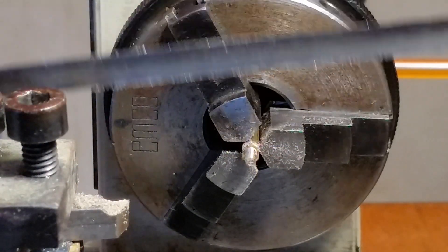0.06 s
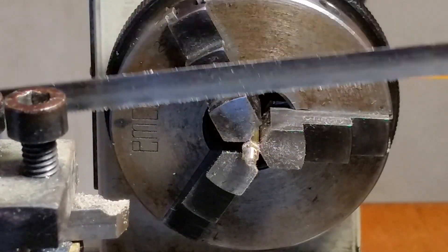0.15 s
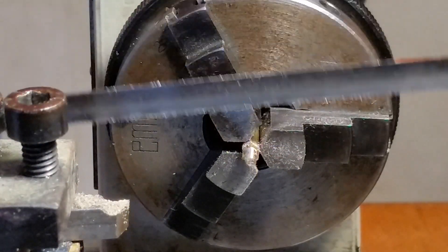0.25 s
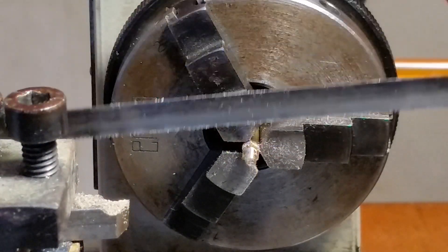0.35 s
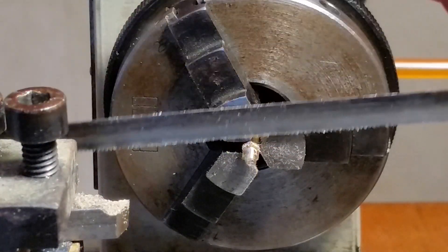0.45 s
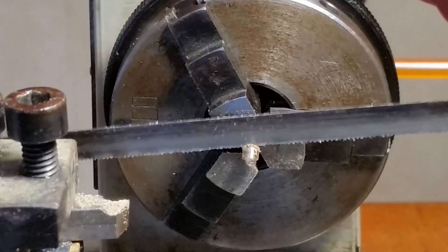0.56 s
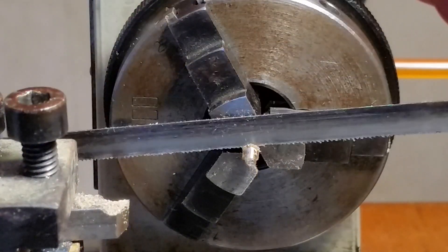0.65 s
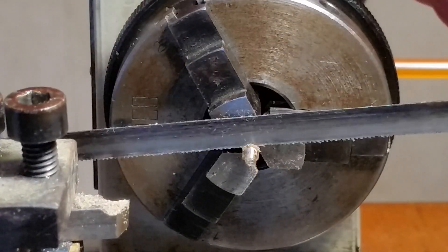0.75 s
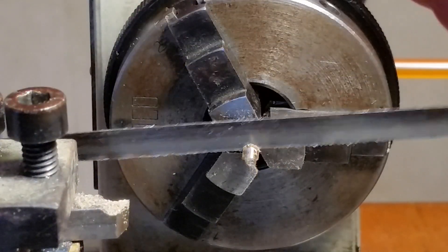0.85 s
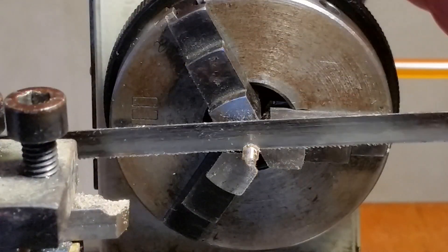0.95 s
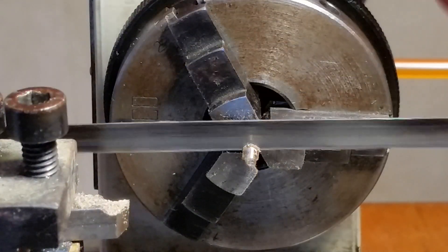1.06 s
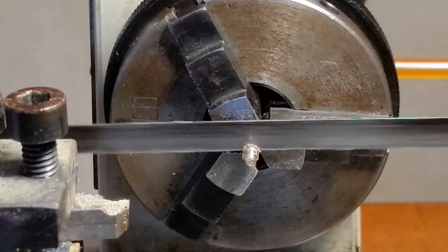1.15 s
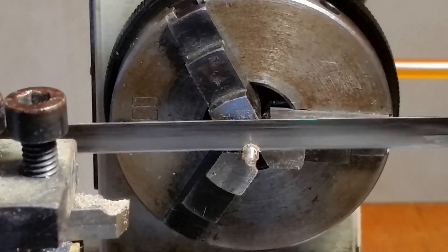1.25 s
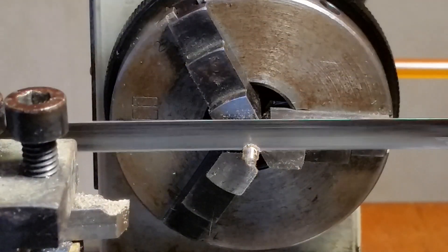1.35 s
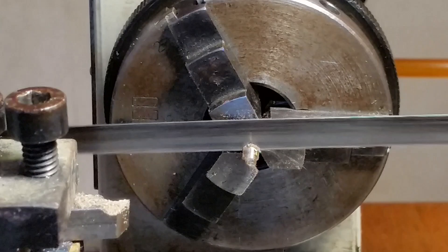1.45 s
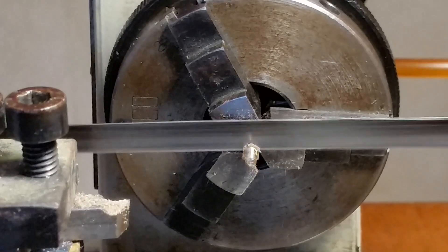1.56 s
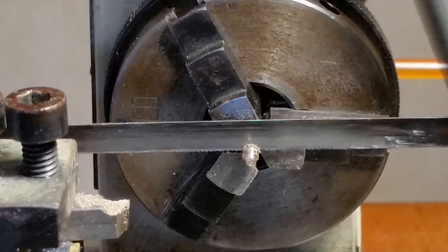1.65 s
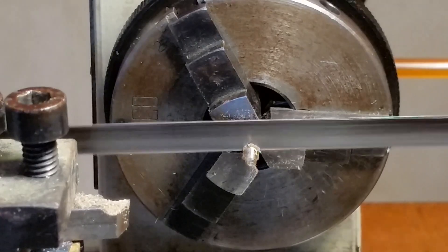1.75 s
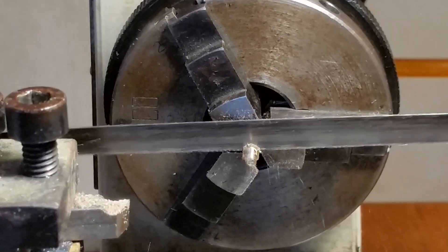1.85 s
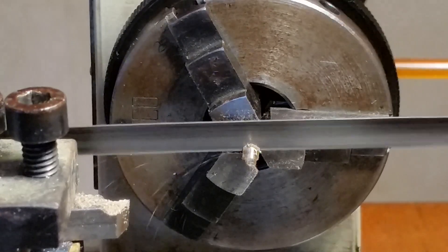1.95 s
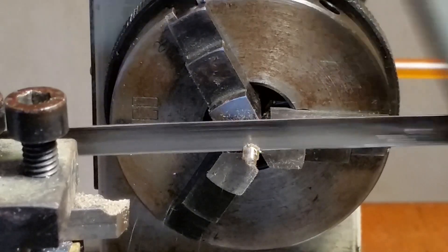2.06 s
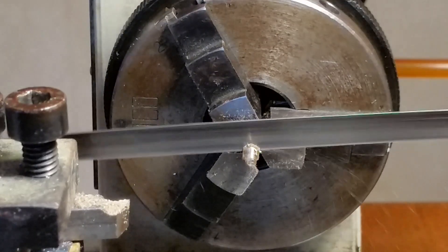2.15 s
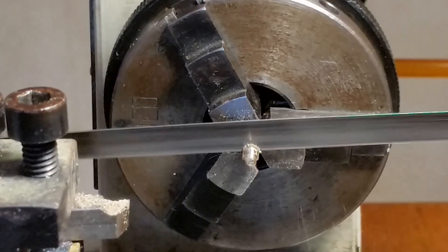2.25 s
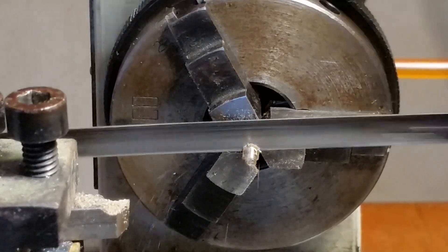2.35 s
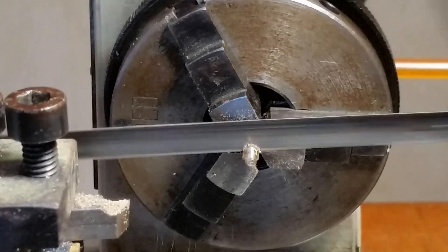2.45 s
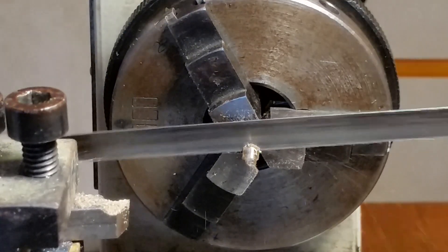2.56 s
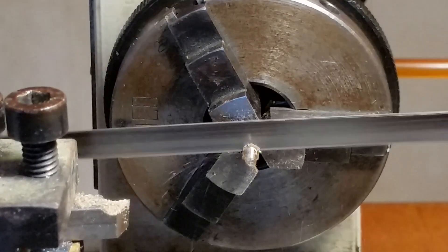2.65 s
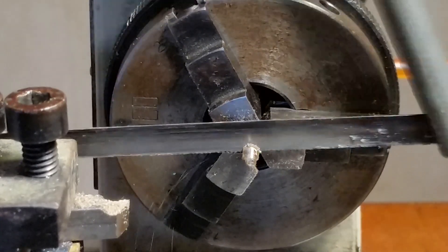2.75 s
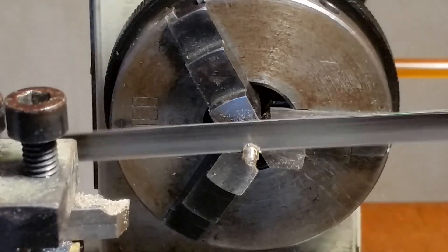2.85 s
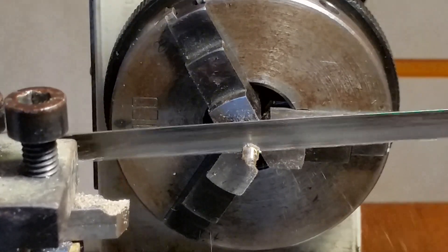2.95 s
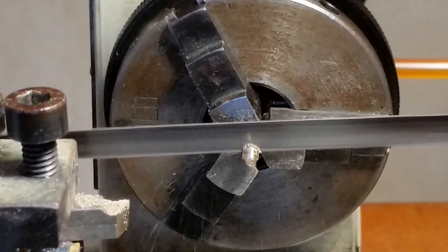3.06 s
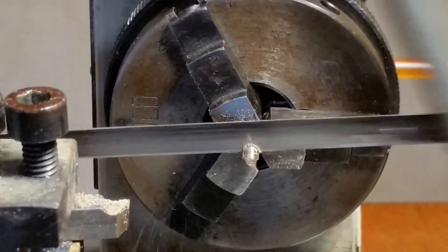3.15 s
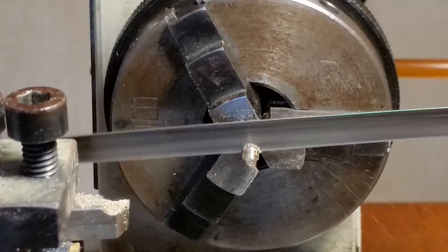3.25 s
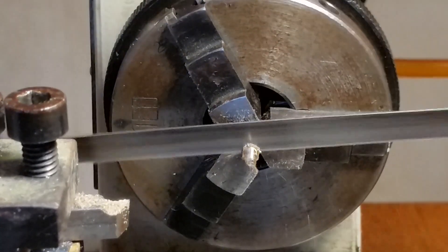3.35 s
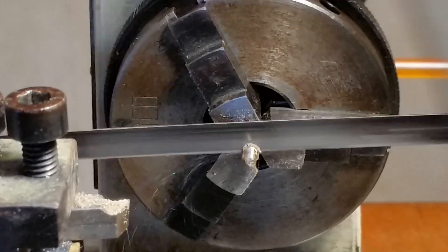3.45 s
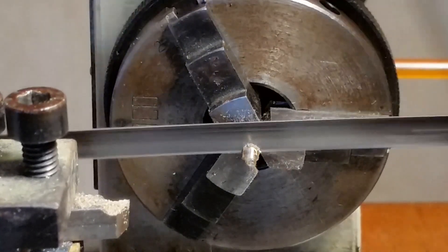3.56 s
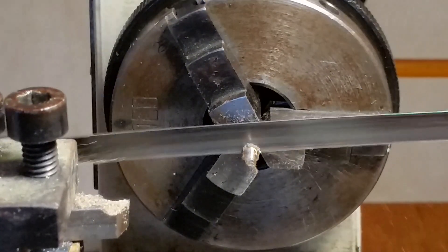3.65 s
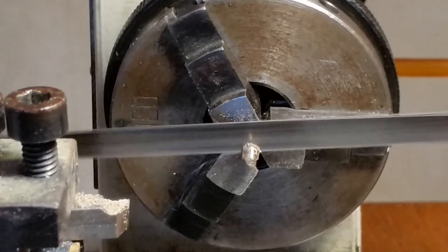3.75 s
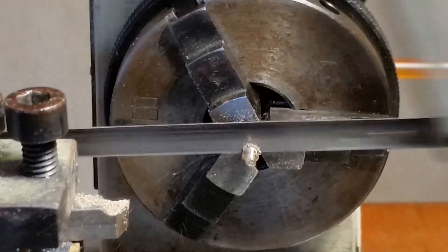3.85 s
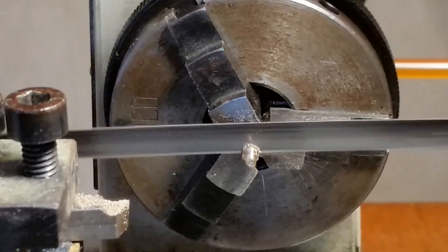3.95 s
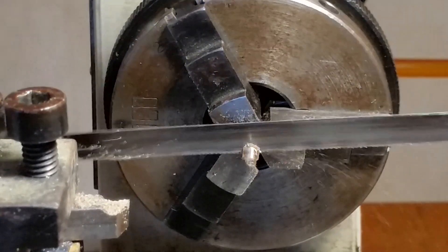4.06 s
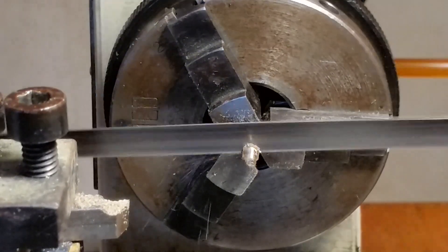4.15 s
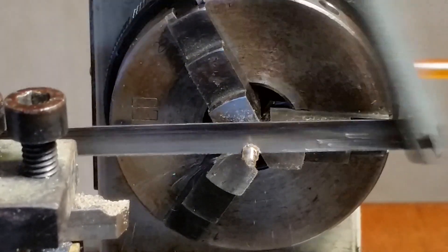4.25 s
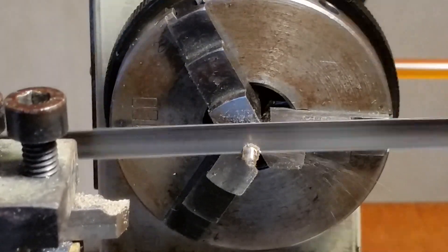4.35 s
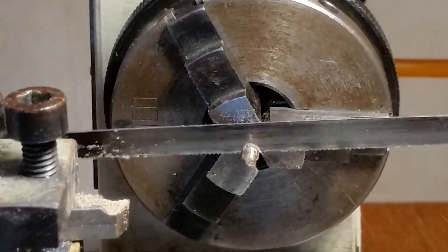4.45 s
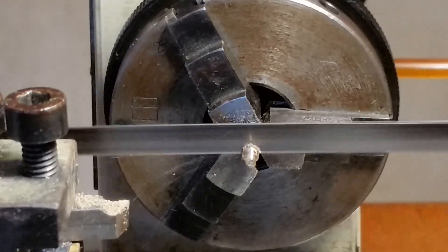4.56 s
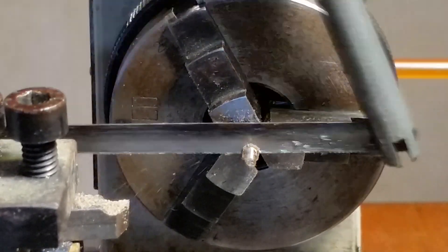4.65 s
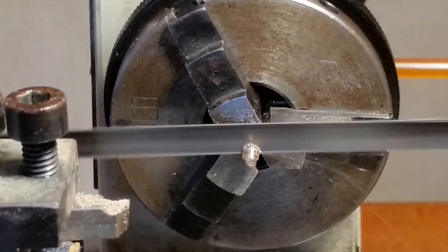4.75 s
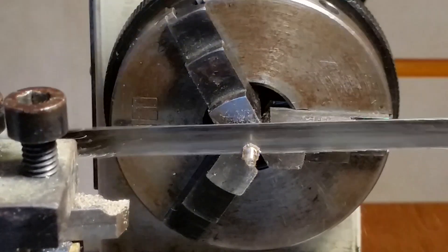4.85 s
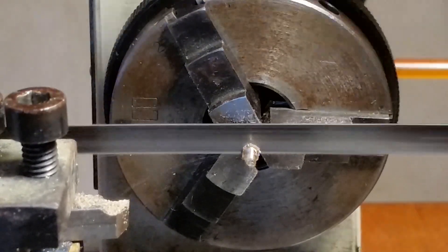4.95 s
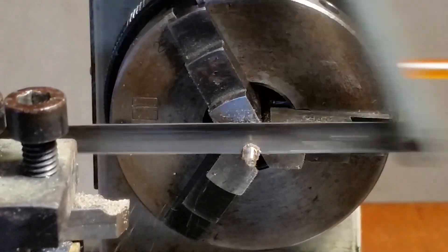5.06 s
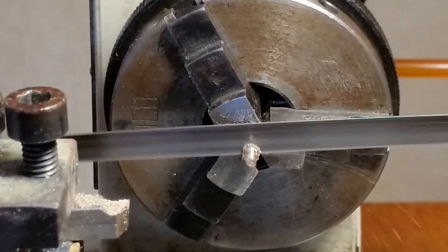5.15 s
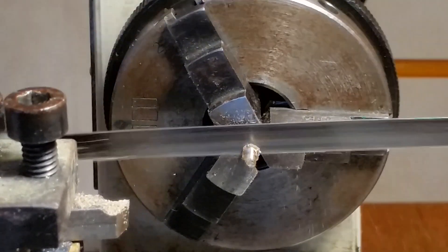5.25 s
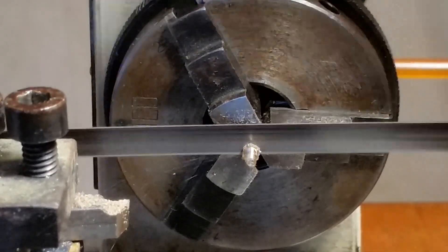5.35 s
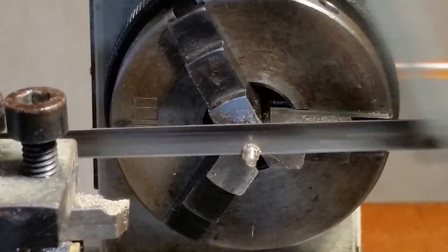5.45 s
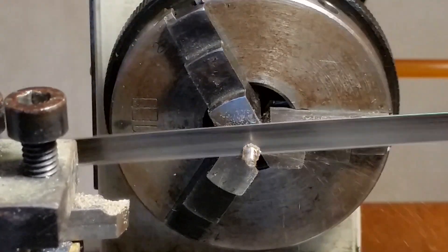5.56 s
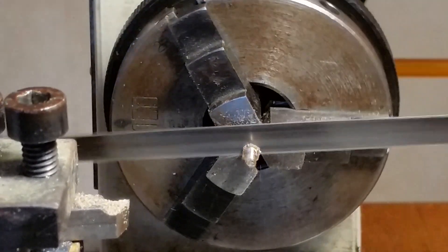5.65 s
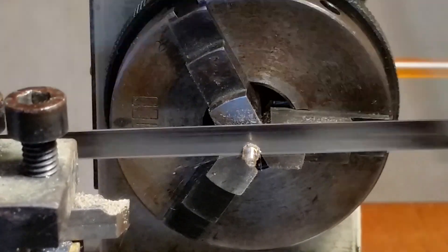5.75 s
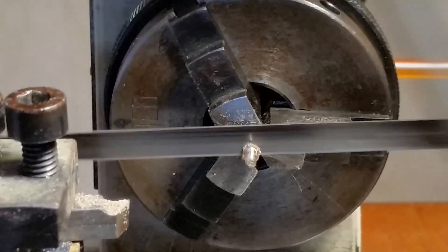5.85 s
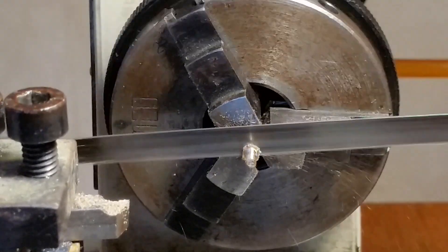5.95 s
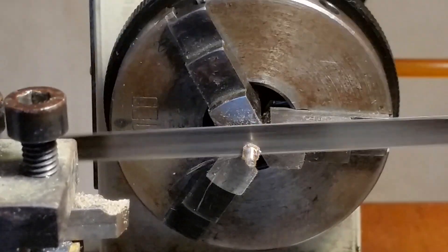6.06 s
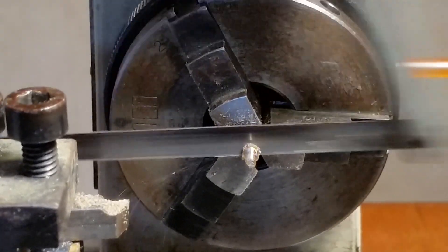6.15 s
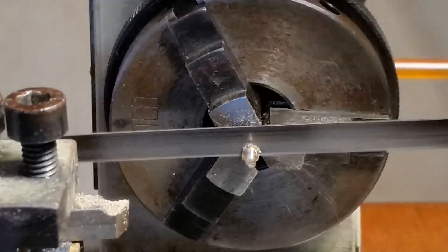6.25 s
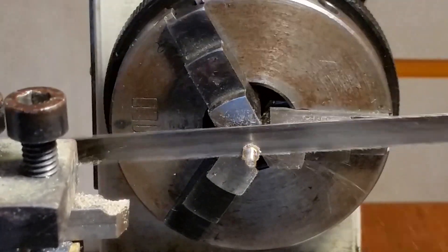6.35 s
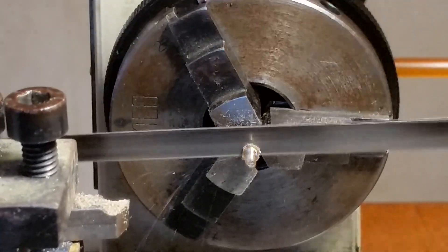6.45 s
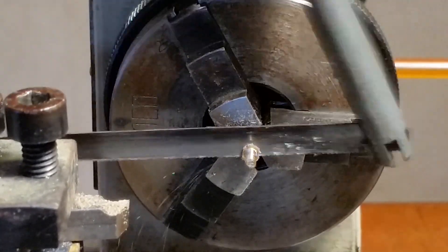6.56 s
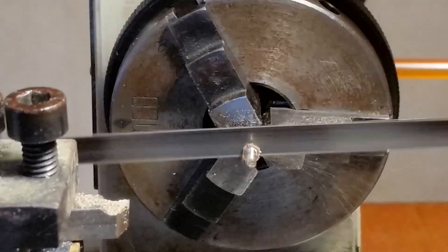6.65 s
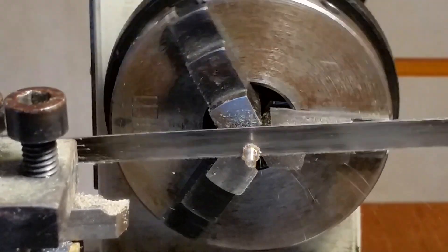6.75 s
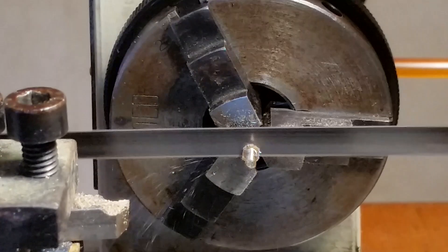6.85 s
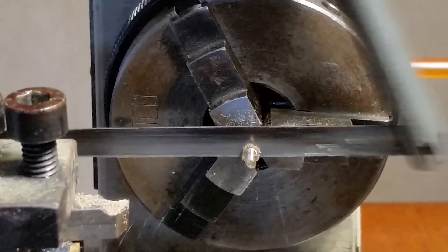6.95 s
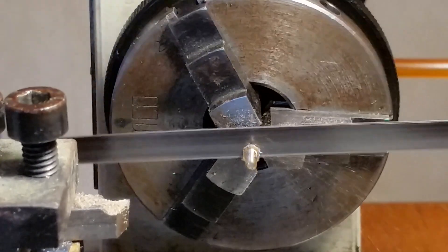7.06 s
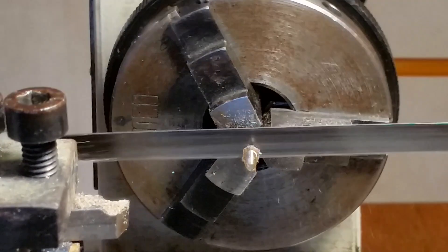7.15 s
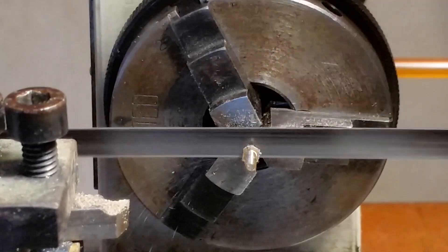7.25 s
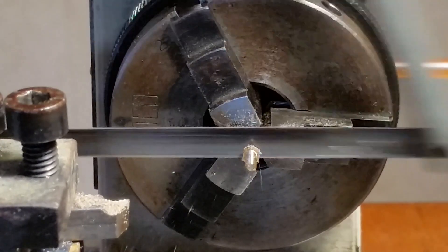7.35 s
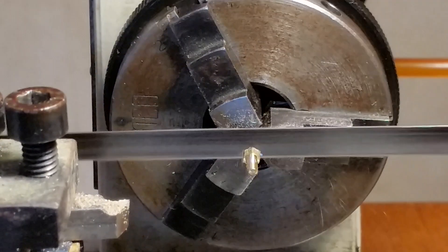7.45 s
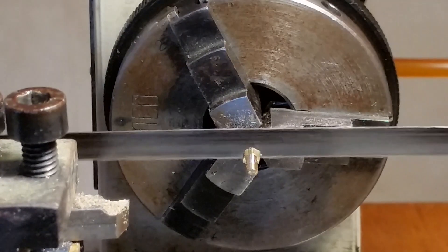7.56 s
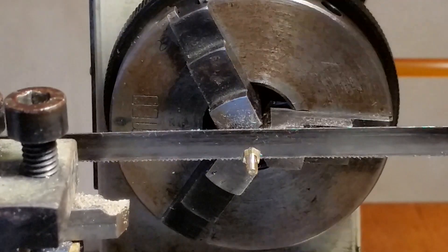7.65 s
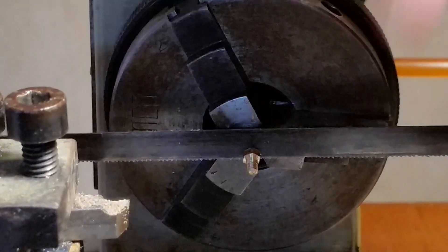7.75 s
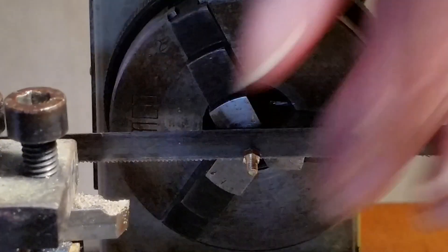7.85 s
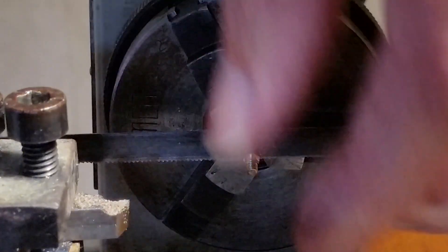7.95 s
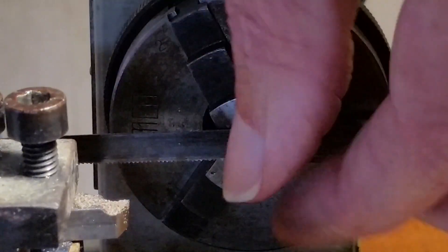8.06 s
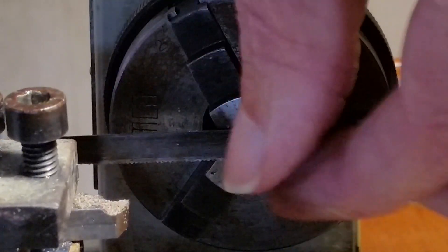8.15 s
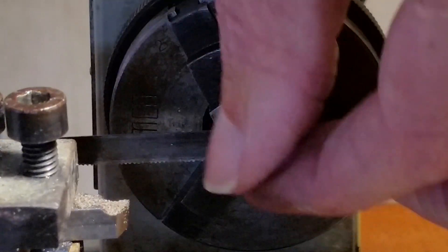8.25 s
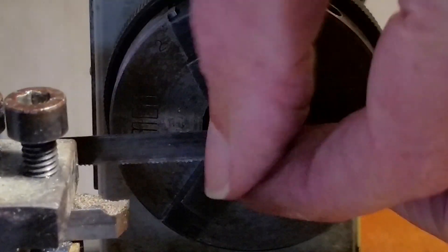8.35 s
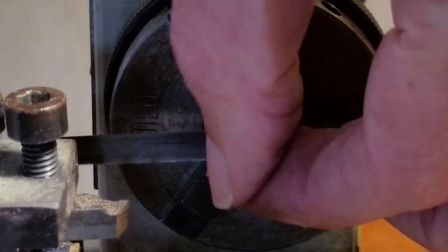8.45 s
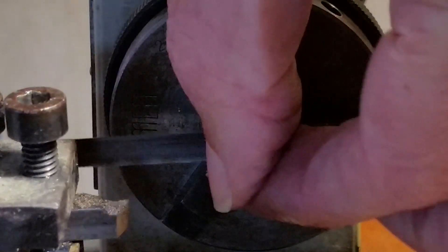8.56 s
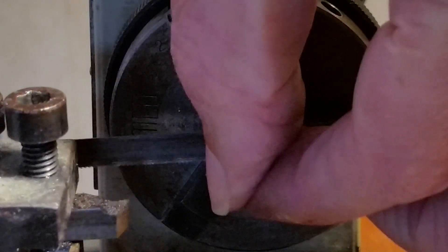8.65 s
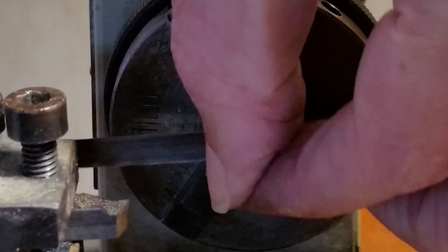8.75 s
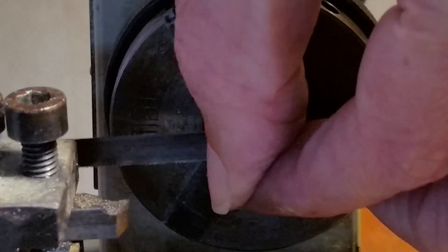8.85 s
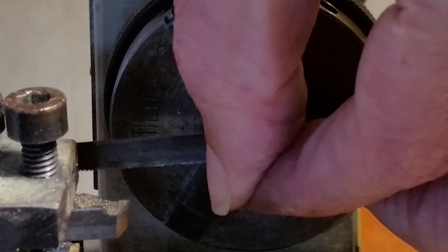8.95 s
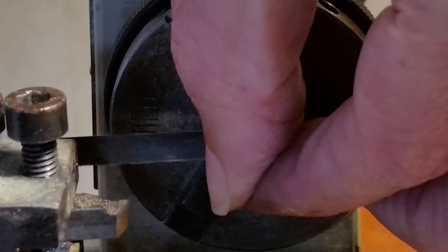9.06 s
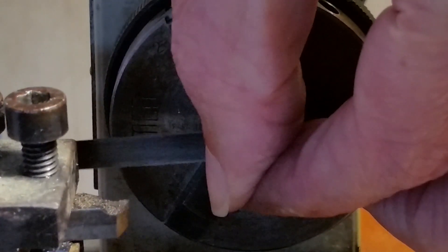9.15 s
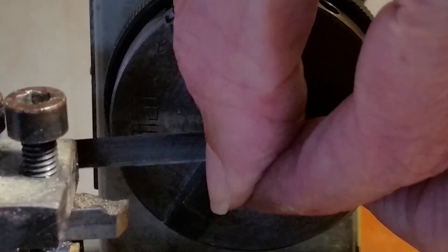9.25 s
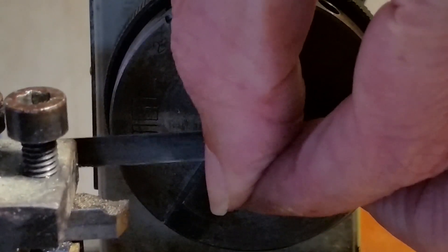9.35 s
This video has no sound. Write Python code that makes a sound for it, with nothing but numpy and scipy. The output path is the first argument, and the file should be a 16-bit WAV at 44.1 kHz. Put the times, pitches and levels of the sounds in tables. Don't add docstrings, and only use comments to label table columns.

```python
import sys
import numpy as np
from scipy import signal
from scipy.fft import rfft, irfft
from scipy.io import wavfile
from scipy.ndimage import uniform_filter1d

SR = 44100
rng = np.random.default_rng(int(sys.argv[2]) if len(sys.argv) > 2 else 0)


def invert_db(level):
    return 10 ** (np.asarray(level, dtype=float) / 20)


def store_pcm(level_fs):
    pcm = np.round(np.clip(level_fs, -1, 1) * 32767).astype(np.int16)
    wavfile.write(sys.argv[1], SR, np.atleast_2d(pcm).T)


N = 414099
T = np.arange(N) / SR
GROOVED_S = 2.1
CRACK_MODE = (2280, 690, -5)

# pitch_hz, width_hz, level_db
HUM_MODES = [(430, 34, -4.5), (572, 24, -10.5), (695.5, 24, -1), (784.6, 29, -0.5), (850, 30, -2.5),
             (700, 170, -10)]


def saw():
    tooth_hz, pushing, share, (hum, cut, rasp, fizz) = stroke_controls()
    teeth, bite, clicks = passing_teeth(tooth_hz, pushing)
    catches = snags(pushing)

    caught = taps(np.transpose(PULL_SNAGS + PUSH_SNAGS)[0], 0)
    dig = invert_db(3 * fade(caught, 0.036) - 2.5)
    stall = invert_db(0.5 * fade(caught[::-1], 0.0047)[::-1])
    tearing = cut * unit(unit(bite * grit(2.53, 0.64, 120)) + 0.62 * clicks) * dig * stall
    rasp, fizz = rasp * stall, fizz * stall

    out = invert_db(6) * ring(hum * unit(teeth), HUM_MODES)
    out += band(saw_frame(tearing, catches), 314, 3600)
    out += band(saw_blade(tearing, rasp, bite, clicks, share, pushing, catches), 2100, 12000)
    out += band(tooth_edge(fizz, bite, share, catches), 8500, 17000)
    out += flying_chips(catches)
    return out, invert_db(-20.5) * hum ** 0.33


# start_s, top_tooth_rate_hz, pressure_db, hum_evenness_db
PULLS = [(1.269, 653.7, -18.5, -19), (1.631, 733, -5.5, -7.5), (2.002, 700, -3, -8),
         (2.366, 678.7, -2, -4.5), (2.735, 682.7, -0.5, -4), (3.095, 679.6, -0.8, 0.5),
         (3.465, 706.7, 1.4, -0.5), (3.844, 723, -0.3, 1), (4.223, 760, 1.5, -1), (4.612, 770, 1.5, -2),
         (4.995, 766.7, -1, -8.5), (5.377, 747.6, -1.4, -2), (5.759, 708.4, -1.7, -1),
         (6.146, 742.8, -2.3, 0.5), (6.52, 775, -1.5, -3), (6.899, 718.4, -1.5, -0.5),
         (7.284, 719.6, 2.5, 0.5)]
# start_s, top_tooth_rate_hz, pressure_db, hum_evenness_db
PUSHES = [(1.435, 622.7, -5, -6.5), (1.807, 622, -2.5, 2.5), (2.168, 731.4, -0.1, -7.5),
          (2.536, 706.5, -1, -10.5), (2.901, 700, 0, -4), (3.268, 729, -0.2, -5), (3.635, 768.5, -1, -2),
          (4.028, 793.5, 0.5, -3), (4.408, 782.5, 0, -3), (4.805, 782.8, -0.3, -1),
          (5.175, 808.4, -0.3, -1), (5.557, 786.3, -1.5, -2), (5.942, 769, -1, 2), (6.324, 780, 0, 2.5),
          (6.699, 794, 1.5, -1), (7.078, 760, 1.5, -1), (7.467, 651, 0.5, 2)]
# top_db, reached_share (0-1), held_until_share (0-1), start_drop_db, end_drop_db
PULL = [
    (-41.5, 0.28, 0.59, 13.5, 13),
    (-33, 0.48, 0.56, 8, 20),
    (-39, 0.58, 0.78, 13, 19.5),
    (-46, 0.8, 0.72, 12, 27),
]
# top_db, reached_share (0-1), held_until_share (0-1), start_drop_db, end_drop_db
PUSH = [
    (-35, 0.49, 0.5, 23, 22),
    (-27.5, 0.48, 0.51, 20, 33),
    (-37, 0.29, 0.42, 16.5, 20.7),
    (-44.5, 0.19, 0.58, 55, 29),
]
# time_s, fine_chips_db
GROOVE = [
    (1.3, -14),
    (1.9, -3.5),
    (4.5, -1.2),
    (5.7, 1.5),
    (6.6, 0),
    (7.3, -3),
    (7.66, -13),
]


def stroke_controls():
    start, top_hz, press_db, even_db = np.transpose(sorted(PULLS + PUSHES))
    stop_s = 7.665
    turns = np.append(start, stop_s)
    place = np.interp(T, turns, np.arange(len(turns))) % len(start)
    index, share = place.astype(int), place % 1
    pushing = index % 2
    middle = (turns[1:] + turns[:-1]) / 2
    sawing = uniform_filter1d(1. * (T > start[0]) * (T < stop_s), size=800)

    pressure_db = np.interp(T, middle, press_db)
    groove_db = np.interp(T, *np.transpose(GROOVE))
    extra_db = [np.interp(T, middle, even_db), 0, 0.23 * groove_db, groove_db]
    gains = []
    for pull, push, extra in zip(PULL, PUSH, extra_db):
        db = np.where(pushing, swell(share, *push), swell(share, *pull)) + pressure_db + extra
        gains.append(sawing * invert_db(uniform_filter1d(db, size=300)))

    speed = np.minimum(np.minimum(.2 + 2.4 * share, 1), .55 + 2.5 * (1 - share))
    return top_hz[index] * speed, pushing, share, gains


def swell(share, top_db, reach, hold, start_db, end_db):
    rise = np.clip(1 - share / reach, 0, 1)
    fall = np.clip((share - hold) / (1 - hold), 0, 1)
    return top_db - start_db * rise ** 1.57 - end_db * fall ** 1.57


def passing_teeth(tooth_hz, pushing):
    wobble = np.where(pushing, .045, .12)
    phase = np.cumsum(tooth_hz * (1.02 + wobble * walk(200))) / SR
    hum = np.sin(2 * np.pi * phase) * invert_db(3.6 * walk(120))
    bite = 0.39 + np.exp(-(phase % 1) / 0.18)
    bite *= invert_db(2.9 * walk(180))
    bite *= invert_db(2.5 * np.cos(2 * np.pi * phase / 8.6))
    tick_gain = invert_db(13 * np.minimum(rng.standard_normal(N), 1.4))
    clicks = unit(np.diff(np.floor(phase), prepend=0) * tick_gain)
    return hum, bite, clicks


# time_s, peak_db, low_modes_rel_db
PULL_SNAGS = [(1.7304, -22, -1.5), (2.079, -15.5, -16), (2.445, -16, -21), (2.8092, -15, -31),
              (3.1746, -18, -15), (3.546, -19.5, -13), (3.9313, -16.5, -24.5), (4.3137, -18, -12.5),
              (4.6917, -12.5, -18), (5.0697, -15, -11), (5.459, -18, -7.5), (5.8405, -19, -8.5),
              (6.2247, -15, -14), (6.585, -16, -26), (6.9764, -17.5, -9.5), (7.3672, -16, -33)]
# time_s, peak_db, low_modes_rel_db
PUSH_SNAGS = [(1.5075, -19, -20), (1.887, -18, -4), (2.243, -11, -5), (2.6126, -9, -3.5),
              (2.977, -12, -6.5), (3.342, -10.5, -5), (3.7146, -11, -6.5), (4.1034, -12, -2.5),
              (4.4885, -10.5, -5), (4.8817, -9.5, -5.5), (5.2518, -10.5, -3.5), (5.6429, -10.5, -3.5),
              (6.0258, -14.5, 0), (6.411, -13, -3), (6.7934, -19, 5.5), (7.194, -14.5, -5.5),
              (7.5595, -20, -0.5)]
# earlier_s (negative is later), rel_db, low_modes_more_db
PULL_LEADS = [(-0.027, -8, 10.5)]
# earlier_s (negative is later), rel_db, low_modes_more_db
PUSH_LEADS = [(-0.011, -17.5, 1.5)]
# time_s, peak_db, low_modes_rel_db
STRAY_SNAGS = [(1.467, -28.5, -33), (1.526, -21.5, -17), (1.7089, -21, -16), (1.874, -16.5, -10),
               (3.945, -17.5, -3.5), (4.169, -25, 3), (7.17, -17, 0.5), (7.5541, -21, -4),
               (2.093, -19.5, -10), (7.4993, -25.5, 7), (7.515, -20.5, 3.5)]
# time_s, upper_peak_db, low_modes_rel_db
EARLY_SNAGS = [(1.677, -36, -1), (1.699, -31, 4), (1.912, -31, -11), (2.067, -33, -11.5),
               (2.183, -29.5, -16), (2.2204, -29, -1), (2.4213, -30.5, -8), (2.5613, -33, -8.5),
               (2.588, -25.5, 2.5), (2.6977, -27.5, -10), (2.7729, -30.5, -8), (2.7876, -27, -12),
               (2.8752, -31.5, -10), (2.9317, -26, -13), (2.948, -44, 6), (3.137, -36, -14),
               (3.152, -24, -12), (3.315, -33.5, 2), (3.5102, -33, -7), (3.524, -23, -7.5),
               (3.557, -32.5, -13), (3.8981, -25, -12), (3.9101, -22.5, -8), (4.0794, -35, -0.5),
               (4.268, -39.5, -4.5), (4.2854, -26.5, -9.5), (4.2958, -28.5, -5.5), (4.4713, -26, 1.5),
               (4.6702, -28, -6), (4.6796, -26.5, -8), (4.8396, -24.5, 3), (5.0398, -32, -6),
               (5.0498, -25, -4), (5.2105, -30.5, 4), (5.2362, -19.5, -4.5), (5.4314, -28.5, -5.5),
               (5.4421, -24.5, -8.5), (5.6082, -36, 13), (5.6229, -25, 0.5), (5.8116, -29, -4),
               (5.8223, -24, -5.5), (5.9834, -45, -6), (6.0037, -31, 8), (6.1842, -32, 3.5),
               (6.2054, -22.5, -6.5), (6.3886, -40, 0), (6.3951, -26.5, 2), (6.5483, -28, -4),
               (6.5974, -22, 1), (6.7467, -30, 6), (6.774, -19.5, -4), (6.8162, -17, -4),
               (6.9564, -19.5, -3.5), (7.1212, -34, 6.5), (7.142, -30.5, 11.5), (7.2312, -37, -2.5),
               (7.3214, -26, -8), (7.3397, -20.5, -5)]


def snags(pushing):
    rows = PULL_SNAGS + PUSH_SNAGS + STRAY_SNAGS
    for main, leads in ((PULL_SNAGS, PULL_LEADS), (PUSH_SNAGS, PUSH_LEADS)):
        for early_s, less_db, more_db in leads:
            rows = rows + [(s - early_s, db + less_db, low_db + more_db)
                           for s, db, low_db in main if s > GROOVED_S]
    rows = rows + [(s, db + 2, low_db - 2) for s, db, low_db in EARLY_SNAGS]
    s, db, low_db = np.transpose(rows)
    pulled_db = 1 - pushing[(s * SR).astype(int)]
    return s, db + pulled_db, low_db - pulled_db


def crack(s, db):
    bounce_s = .0055
    db = db + 13.5
    return taps(s, db) - taps(s + bounce_s, db - 2.5) + taps(s + 2 * bounce_s, db - 5.5)


# pitch_hz, width_hz, level_db
LOW_MODES = [(559, 138, -2), (760, 177, -2), (1003, 100, -4), (1116, 49, -4), (1266, 53, -2),
             (1468, 84, -8), (1548, 92, -9), (1690, 75, -5.5)]
# pitch_hz, width_hz, level_db
HIGH_MODES = [(2260, 760, -6.5), (2313, 62, 4), (2445, 100, -1), (2754, 152, 1.5), (2696, 42, -8.5),
              (2870, 160, -26.5)]


def saw_frame(tearing, catches):
    s, db, low_db = catches
    rise_s = 0.0018
    low_jolt = blows(s, db + low_db - 5.5, 0.005, rise_s) + invert_db(-2.5) * crack(s, db + low_db)
    high_jolt = blows(s, db - 13.5, 0.011, rise_s) + crack(s, db - 5.5)
    frame = struck(tearing * invert_db(-2.5), LOW_MODES, shift_db=3, rate=40)
    frame += struck(low_jolt, LOW_MODES[2:])
    frame += struck(tearing * invert_db(-7), HIGH_MODES, shift_db=3, rate=40)
    frame += struck(high_jolt, HIGH_MODES + [CRACK_MODE])
    thuds = after(PUSH_SNAGS, [(-.025, -18.5), (.004, -16)])
    frame += struck(taps(*np.transpose(thuds)), [(460, 42, 0), (578, 69, 0.0051)])
    return frame


# pitch_hz, width_hz, level_db
RASP_MODES = [(3400, 840, -21), (3650, 270, -6.5), (4490, 220, -2), (5340, 410, -1.5), (6340, 530, -6.5),
              (6640, 110, 9), (6825, 540, 1.5), (7430, 510, -2.5), (8203, 130, -0.5)]


def saw_blade(tearing, rasp, bite, clicks, share, pushing, catches):
    s, db, _ = catches
    rasping = rasp * unit(unit(bite * grit(1.6, 1.1, 130)) + 1.1 * clicks)
    dulling = invert_db(-8 * (1.5 - pushing) * np.clip((share - 0.38) / 0.13, 0, 1))
    blade = struck(rasping * invert_db(-4), RASP_MODES[2:-2], shift_db=3, rate=70)
    blade += struck(tearing * invert_db(-24), RASP_MODES[:2], shift_db=2, rate=56)
    blade += struck(rasping * dulling * invert_db(-13.5), RASP_MODES[-2:], shift_db=3.5, rate=64)
    blade += sing(share, rasp * grit(3, 3, 110), end_hz=4699.5, sag_hz=-1200, width_hz=200.5, db=-17.5)
    blade += struck(blows(s, db - 17.5, 0.0063), RASP_MODES)
    return blade


# pitch_hz, width_hz, level_db
FIZZ_MODES = [(8900, 990, -8.5), (9980, 300, 0.5), (10520, 900, -6), (12050, 430, -1), (13440, 250, 4),
              (13900, 910, -5.5), (15300, 570, 0.5)]
# time_s, peak_db
SNAPS = [(1.8539, -36), (2.0525, -38), (2.2221, -32), (2.4441, -32), (2.5882, -36), (2.6311, -33.5),
         (2.8062, -36), (2.9549, -29), (3.1719, -33), (3.2872, -33.5), (3.361, -33), (3.5096, -35.5),
         (3.5286, -32), (3.5705, -39), (3.6618, -39), (3.6957, -27), (3.7331, -34), (3.8968, -38),
         (3.9157, -37), (3.9302, -33.5), (4.0689, -38), (4.0838, -34.5), (4.256, -37.5), (4.3133, -34.5),
         (4.4545, -31), (4.4545, -36.5), (4.4725, -32.5), (4.5054, -25), (4.6655, -35.5), (4.8381, -37.5),
         (4.8526, -33), (5.0247, -36), (5.0681, -28), (5.2208, -33), (5.2906, -26), (5.4582, -30),
         (5.5884, -37), (5.6074, -25.5), (5.6558, -31), (5.6767, -33), (5.8399, -30), (5.9681, -42.5),
         (5.983, -32), (5.9925, -29), (6.0718, -30.5), (6.1781, -36.5), (6.223, -29.5), (6.3542, -42),
         (6.3711, -32), (6.428, -30), (6.5448, -36.5), (6.5901, -23), (6.7248, -39), (6.9608, -35),
         (6.9748, -25.5), (7.1294, -32), (7.303, -41), (7.5016, -41)]


def tooth_edge(fizz, bite, share, catches):
    s, db, _ = catches
    fizzing = fizz * unit(bite ** 0.6 * grit(2.9, 0.49, 120))
    edge = struck(fizzing * invert_db(-0.5), FIZZ_MODES, shift_db=3, rate=45)
    edge += sing(share, fizz * grit(3, 3, 90), end_hz=15501.5, sag_hz=1499.5, width_hz=247.5, db=-9.5)
    snap_s, snap_db = np.transpose(SNAPS)
    edge += struck(blows(snap_s, snap_db + 1, .001), FIZZ_MODES)
    edge += struck(blows(s, db - 25, 0.0021), FIZZ_MODES)
    return edge


def sing(share, force, end_hz, sag_hz, width_hz, db):
    hz = end_hz - sag_hz * np.clip(1 - np.abs(share - .55) / .35, 0, 1)
    slow = signal.lfilter(*signal.butter(2, width_hz, fs=SR), force) * np.sqrt(SR / width_hz)
    return invert_db(db) * slow * np.cos(2 * np.pi * np.cumsum(hz) / SR)


# time_s, peak_db, pitch_hz
GLINTS = [(1.7118, -28, 7000), (2.0673, -30.5, 3650), (2.219, -29, 5460), (2.4507, -24.5, 7020),
          (2.5602, -27.5, 6500), (2.814, -31.5, 3760), (2.9196, -30.5, 6800), (2.937, -25.5, 5340),
          (3.292, -27, 6700), (3.302, -22.5, 5240), (3.5946, -26.5, 6600), (3.6582, -25.5, 6620),
          (3.6753, -22, 4860), (3.7087, -25.5, 5420), (3.978, -22.5, 6670), (4.0455, -28.5, 5356),
          (4.069, -20.5, 6600), (4.0967, -20, 6640), (4.3693, -21.5, 6676), (4.437, -20, 6580),
          (4.4549, -22.5, 6622), (4.749, -24.5, 6735), (4.853, -22, 7867), (5.073, -23, 7000),
          (5.6082, -20, 6732), (5.9684, -27, 6640), (5.9835, -24, 6597), (6.3566, -29.5, 6530),
          (7.102, -29, 6640), (7.1306, -22, 6617)]
# after_catch_s, peak_db, pitch_hz
PULL_RINGS = [
    (-.004, -32, 7940),
    (.003, -33, 3690),
    (.003, -37, 6800),
    (0.016, -42, 4500),
]
# after_catch_s, peak_db, pitch_hz
PUSH_RINGS = [
    (-.064, -37, 5400),
    (-.041, -31, 5350),
    (-.04, -42.5, 4500),
    (-.034, -32, 6750),
    (-.008, -36, 5400),
    (.002, -34, 4500),
]


def flying_chips(catches):
    s, db, _ = catches
    thrown = list(zip(s, db - 25.5, 6750 + 250 * rng.standard_normal(len(s))))
    rings = after(PULL_SNAGS, PULL_RINGS) + after(PUSH_SNAGS, PUSH_RINGS)
    return pings(GLINTS + thrown + rings, .0007, 0.0067)


def after(catches, rule):
    rows = [(s + row[0], *row[1:]) for s, *_ in catches if s > GROOVED_S for row in rule]
    chance = rng.standard_normal((len(rows), 2))
    return [(s + 0.0016 * late, db + 2.5 * more, *rest)
            for (s, db, *rest), (late, more) in zip(rows, chance)]


def pings(table, tick_s, ring_s):
    out, age = np.zeros(N), np.arange(1500) / SR
    noise = rng.standard_normal((len(table), 2, len(age)))
    for (s, db, hz), (tick, rough) in zip(table, noise):
        push = rough * np.minimum(age / .002, 1) * np.exp(-age / ring_s)
        tone = signal.lfilter(*signal.iirpeak(hz, 30, SR), push)
        tone = signal.lfilter(*signal.iirpeak(hz, 8, SR), tone)
        ping = 0.64 * tone / np.abs(tone).max() + .015 * tick * np.exp(-age / tick_s)
        start = int(s * SR)
        out[start:start + len(age)] += invert_db(db) * ping
    return band(out, 3000, 15000)


# time_s, peak_db, low_modes_rel_db, bench_rel_db
KNOCKS = [(0.688, -90, 17, 28), (0.927, -84.5, 14, 32.5), (0.9845, -87, 13, 38), (1.0552, -82, 1, 34.5),
          (1.1512, -67.5, 18.5, 36), (1.1963, -51, -6, 11.5), (1.236, -72, 22, 8), (1.304, -40, -2, 8),
          (1.312, -44, -5, -4), (1.319, -44, -10, -3), (1.332, -47.5, -14, -8), (1.347, -35, -6, -8),
          (1.358, -46, 10, -6), (1.373, -40, -6, -1), (1.405, -46, -5, -5), (7.6845, -29.5, -25, 1),
          (7.717, -41, -13, -4), (7.7481, -51, 6, 13), (8.088, -76, 10, 10), (8.6767, -62, -2, -3),
          (8.693, -51, 6, 11), (8.717, -42.5, -11, -7), (8.754, -47, -4, 4), (8.796, -52, -3, 16.5),
          (8.814, -42, -13, -4), (8.859, -36, -8, -12), (8.8808, -32, -17, -4), (8.89, -32.5, -16, -9),
          (8.957, -42.5, 5.5, 14), (9.0016, -44, -5, 18), (9.0059, -41.5, 8.5, 15.5),
          (9.119, -27.5, -19, 2.5), (9.178, -37.5, -8, 2.5), (9.2265, -52, 1, 4), (9.248, -40, -5, 3),
          (9.26, -39, -1, 1), (9.278, -28.5, -6.5, -6), (9.3001, -29.5, 5.5, 7.5), (9.3782, -39.5, -12, 10)]
# pitch_hz, width_hz, level_db
THUD_MODES = [(262, 74, 2), (415, 230, 2), (610, 127, 3), (760, 290, -3)]
# pitch_hz, width_hz, level_db
CHUCK_BODY = [(231, 62, 2), (334, 79, 2.5), (446, 120, -3), (615, 200, -14.5)]


def handling():
    s, db, low_db, _ = np.transpose(KNOCKS)
    low = db + low_db
    rasp_db = np.where(s < 1.25, 6, np.where(s < 1.45, -3.5, -10.5))
    rub = hand_gain(column=2) * grit(1.5, 4.3, 80)

    low_force = rub * invert_db(-16.5) + blows(s, low - 11.5, 0.0038) + band(taps(s, low + 21), 300, 1600)
    frame = struck(low_force, LOW_MODES + [(1900, 200, -21), (1250, 920, -15)])
    frame += struck(rub * invert_db(-0.5) + blows(s, low - 3, 0.016), THUD_MODES)
    chuck_ring = [(219, 24, -1), (304, 41, 3), (401, 47, -4.5), (505, 77, -6)]
    frame += struck(taps(s, low + 16), chuck_ring)
    high_force = rub * invert_db(-15) + blows(s, db - 9.5, 0.016) + taps(s, db + 11.5)
    frame += struck(high_force, HIGH_MODES[1:-1])
    frame += struck(taps(s, db - 7), [CRACK_MODE])
    jaw_shifts = [(8.957, -44), (9.006, -33), (9.038, -41), (9.3, -38), (9.33, -45)]  # s, dB
    frame += struck(blows(*np.transpose(jaw_shifts), 0.032), CHUCK_BODY)

    scrape = hand_gain(column=3) * grit(2.5, 1.4, 80) * invert_db(4.5) + blows(s, db + rasp_db, 0.0027)
    blade = struck(scrape, RASP_MODES + [(3300, 1100, -12)])
    return band(frame, 170, 2660) + band(blade, 2400, 8400) + invert_db(-21) * struck(scrape, FIZZ_MODES)


# time_s, held_s, bench_boom_db, frame_rub_db, blade_rub_db
HANDS = [(.69, 0.018, -66, -93, -99), (.99, 0.0089, -50.5, -66.5, -103), (1.06, 0.032, -55, -70.5, -91),
         (1.18, 0.048, -46, -55, -70), (1.26, 0.03, -66, -67, -85), (1.33, 0.026, -38.5, -69, -60),
         (7.62, 0.038, -48, -48, -79), (7.712, 0.017, -38, -46.5, -61), (8.53, 0.071, -54, -70.5, -95),
         (8.68, 0.06, -43, -52.5, -73.5), (8.83, 0.066, -34, -47.5, -64), (8.985, 0.017, -44, -50, -64.5),
         (9.04, 0.12, -54, -58, -71), (9.15, 0.063, -40.5, -57, -72), (9.26, 0.038, -37, -48, -58.5),
         (9.375, .03, -36, -59, -74)]


def hand_gain(column):
    def touch(s, held, db, release_db_per_s):
        grip = 491 * np.maximum(s - T, 0)
        release = release_db_per_s * np.maximum(T - s - held, 0)
        return invert_db(db - grip - release)
    hands = sum(touch(row[0], row[1], row[column + 1], 392) for row in HANDS)
    return hands + touch(7.78, 0, (-62, -60, -65)[column - 1], 48.5)


# pitch_hz, width_hz, level_db
BENCH_MODES = [(66, 19.5, -1), (95, 18, 1), (123.6, 13, 2), (158.2, 19.7, 1.5), (213.8, 18.9, 1),
               (276, 700, -12)]
# pitch_hz, width_hz, level_db
LEAN_MODES = [(73.7, 24, -12.5), (103, 21, 8.5), (126.5, 29, -8), (153, 23, -22), (214, 36, -10.5)]


def bench(shove):
    s, db, _, bench_db = np.transpose(KNOCKS)
    knocks = np.zeros(N)
    knocks[(s * SR).astype(int)] = invert_db(db + bench_db + 24.5)
    knocks = np.convolve(knocks, np.hanning(150) / 60)[:N]
    boom = struck(shove * grit(2.2, 1, 22), BENCH_MODES, shift_db=2.5, rate=15)
    boom += struck(knocks, BENCH_MODES)
    lean = hand_gain(column=1) * invert_db(5) * rng.standard_normal(N)
    boom += band(struck(lean, LEAN_MODES), 60, 210)
    return band(band(boom, 38, 337), 42, 910)


# time_s, pitch_hz, level_db
SQUEAK = [
    (7.77, 13940, -100),
    (7.785, 14500, -90),
    (7.81, 15650, -95),
    (7.869, 15750, -98),
    (7.92, 14730, -91),
    (7.95, 14700, -90),
    (7.99, 15400, -82),
    (8.045, 14150, -95),
    (8.055, 14000, -105),
]


def squeak():
    s, hz, db = np.transpose(SQUEAK)
    hz = uniform_filter1d(np.interp(T, s, hz), size=500)
    level = invert_db(np.interp(T, s, db, -140, -140))
    return np.sqrt(2) * level * np.sin(2 * np.pi * np.cumsum(hz) / SR)


def room(x):
    t60_s, early_s = 0.59, 0.05
    age = np.arange(SR) / SR
    late = signal.lfilter(*signal.butter(1, 5000, fs=SR), rng.standard_normal(SR))
    tail = late * np.exp(-np.log(1000) * age / t60_s)
    tail += invert_db(5.5) * rng.standard_normal(SR) * np.exp(-age / early_s)
    tail *= np.minimum(age / 0.015, 1)
    return invert_db(-9.5) * signal.fftconvolve(x, tail / np.linalg.norm(tail))[:N]


# pitch_hz, level_db (per Hz)
SHOP = [(25, -16), (45, -0.5), (65, -12.5), (88, 5), (110, -6.5), (230, -2), (400, -13), (900, -26),
        (2400, -46), (3150, -34.5), (4600, -37.5), (6550, -8), (9200, -60.5), (11500, -38), (14000, -49)]


def shop():
    hz, db = np.transpose(SHOP)
    f = np.fft.rfftfreq(N, 1 / SR) + 1
    colour = invert_db(np.interp(np.log(f), np.log(hz), db))
    noise = irfft(rfft(rng.standard_normal(N)) * colour, N)
    echo = invert_db(-71) * band(rng.standard_normal(N), 540, 4500) * np.exp(-T / 0.13)
    return unit(noise) * invert_db(-70 + 0.46 * walk(0.64)) + echo


def unit(x):
    return x / np.sqrt(np.mean(x ** 2))


def walk(rate):
    count = int(T[-1] * rate) + 2
    return 1.2 * np.interp(T * rate, np.arange(count), rng.standard_normal(count))


def fade(x, time_s):
    return signal.lfilter([1], [1, -np.exp(-1 / (time_s * SR))], x)


def grit(scatter_db, patch_db, patch_rate):
    grains = rng.standard_normal(N) * invert_db(scatter_db * np.minimum(rng.exponential(1, N), 4.5))
    return unit(grains * invert_db(patch_db * walk(patch_rate)))


def taps(times, db):
    out = np.zeros(N)
    np.add.at(out, (times * SR).astype(int), invert_db(db))
    return out


def blows(times, db, chatter_s, rise_s=1e-5):
    out, age = np.zeros(N + 3000), np.arange(3000) / SR
    shape = np.exp(-age / chatter_s) * np.minimum(age / rise_s, 1)
    bursts = np.tanh(2 * rng.standard_normal((len(times), len(age)))) * shape
    for s, gain, burst in zip(times, invert_db(db), bursts):
        start = int(s * SR)
        out[start:start + len(age)] += gain * burst
    return out[:N]


def ring(x, modes, shift_db=0, rate=50):
    out = 0
    for k, (hz, width_hz, db) in enumerate(modes):
        drive = x * invert_db(shift_db * walk(rate)) if shift_db else x
        mode = signal.lfilter(*signal.iirpeak(hz, hz / width_hz, SR), drive)
        out = out + (-1) ** k * invert_db(db) * mode
    return out


def struck(force, modes, shift_db=0, rate=50):
    power = sum(np.pi * width_hz * invert_db(2 * db) / SR for _, width_hz, db in modes)
    return ring(force, modes, shift_db, rate) / np.sqrt(power)


def band(x, low_hz, high_hz):
    return signal.sosfilt(signal.butter(2, [low_hz, high_hz], "band", fs=SR, output="sos"), x)


def scene():
    cutting, shove = saw()
    near = cutting + handling()
    return (near + room(near) + bench(shove) + squeak() + shop())[None]


def roll_off(x):
    return signal.sosfilt(signal.butter(12, 16510, fs=SR, output="sos"), x)


def record(dry):
    low_pass = signal.ellip(10, .3, 70, 15720, fs=SR, output="sos")
    mix = signal.sosfilt(low_pass, dry)
    return roll_off(mix)


dry = scene()
out = record(dry)
store_pcm(out)
```